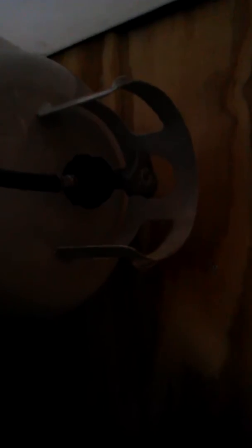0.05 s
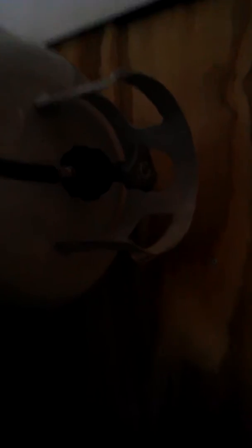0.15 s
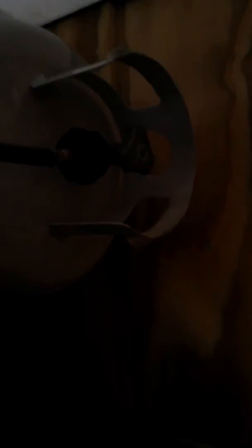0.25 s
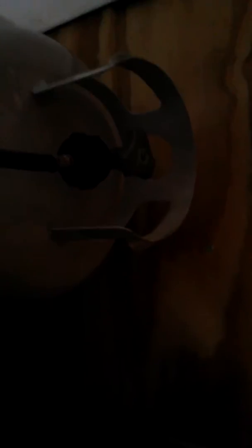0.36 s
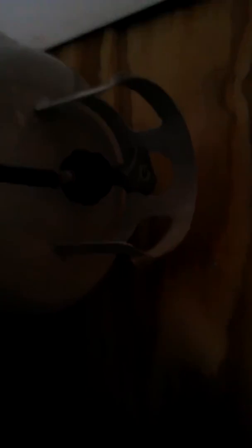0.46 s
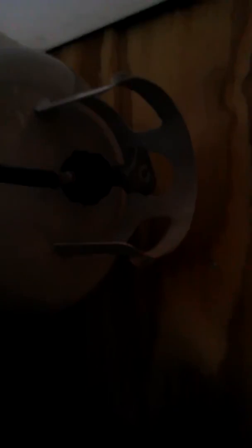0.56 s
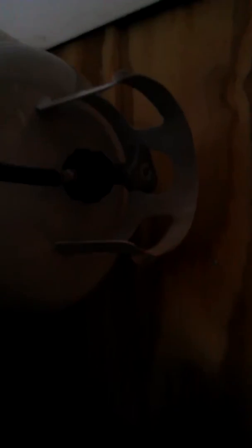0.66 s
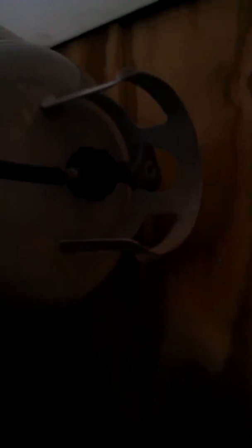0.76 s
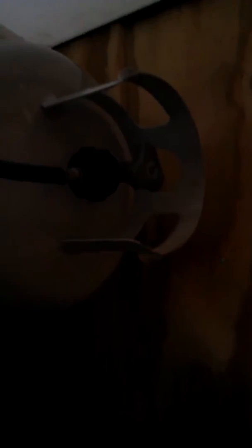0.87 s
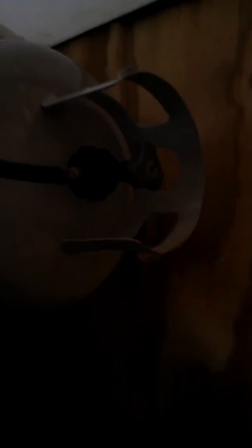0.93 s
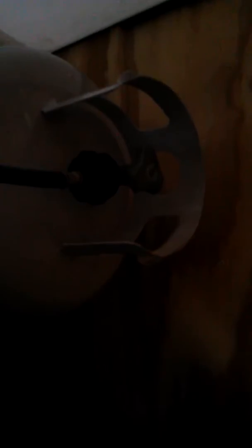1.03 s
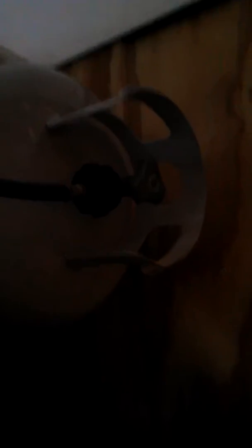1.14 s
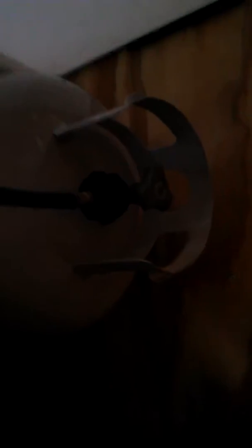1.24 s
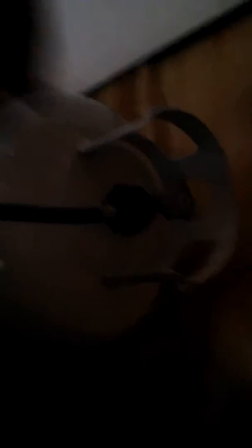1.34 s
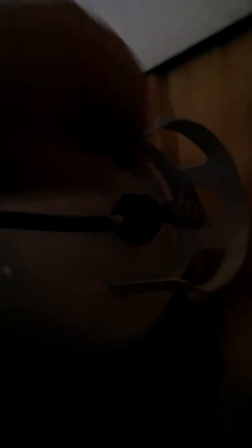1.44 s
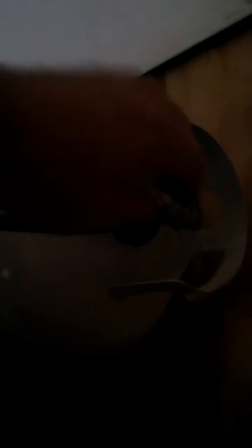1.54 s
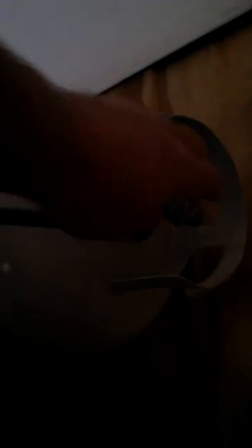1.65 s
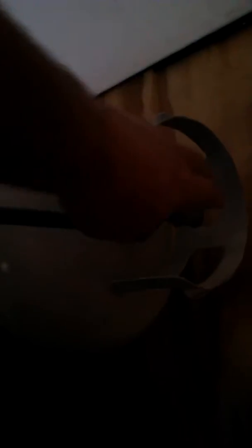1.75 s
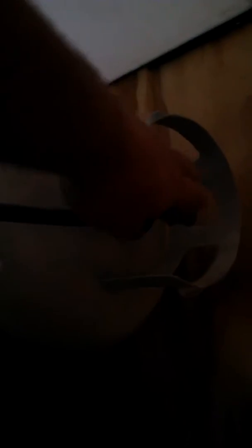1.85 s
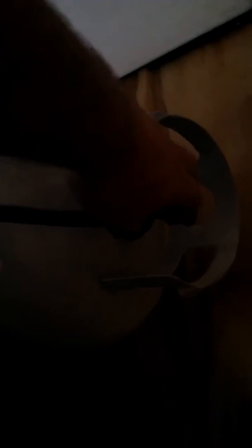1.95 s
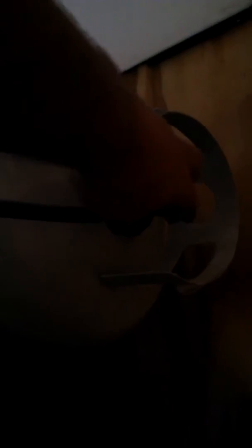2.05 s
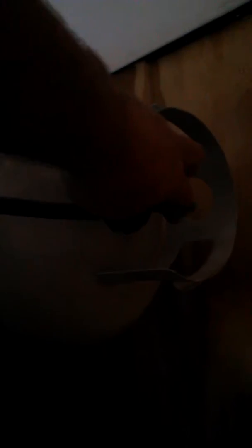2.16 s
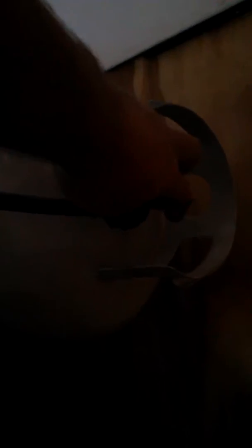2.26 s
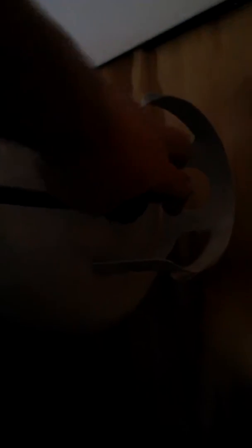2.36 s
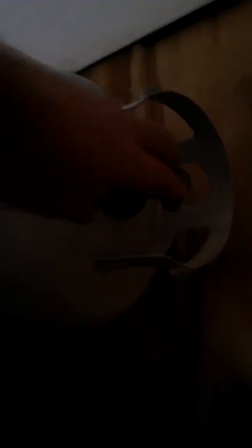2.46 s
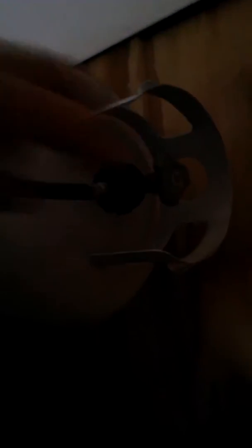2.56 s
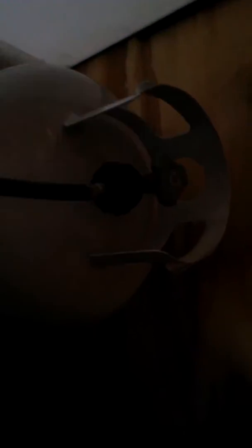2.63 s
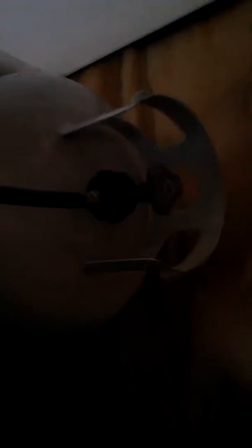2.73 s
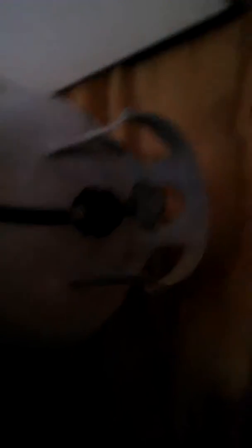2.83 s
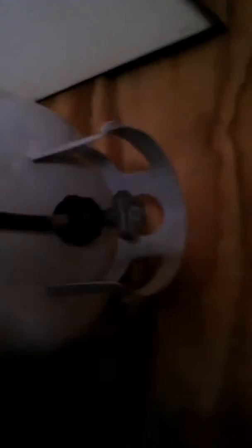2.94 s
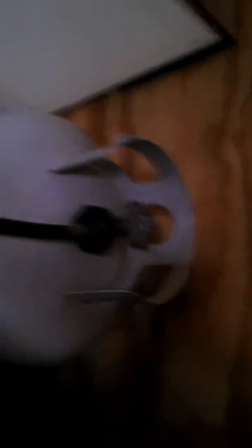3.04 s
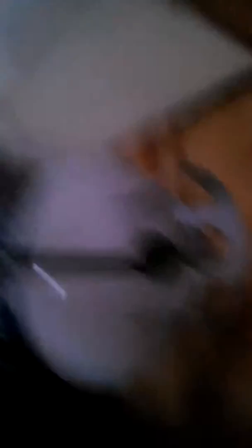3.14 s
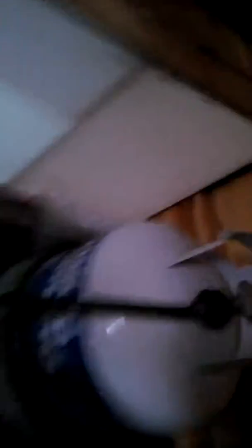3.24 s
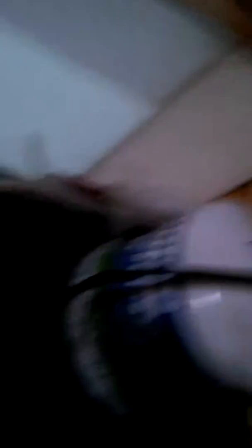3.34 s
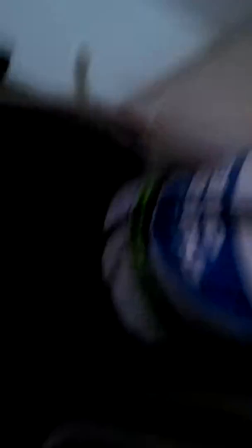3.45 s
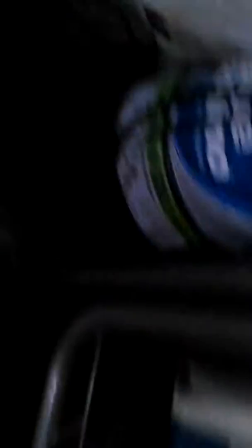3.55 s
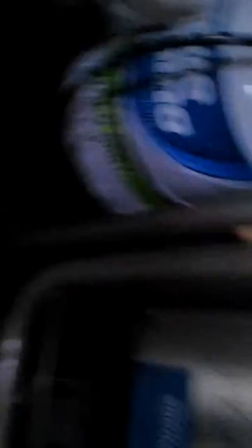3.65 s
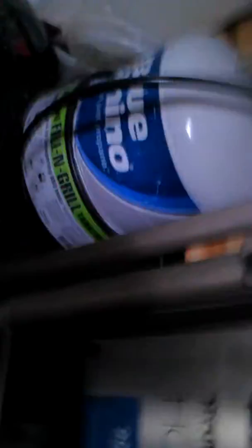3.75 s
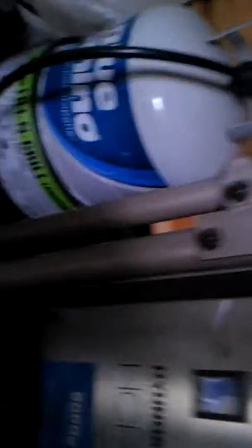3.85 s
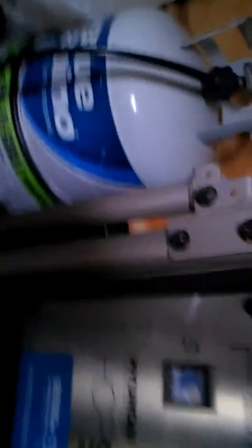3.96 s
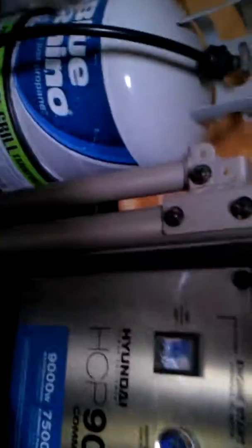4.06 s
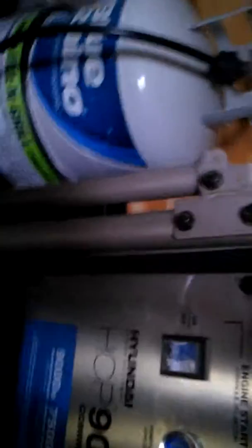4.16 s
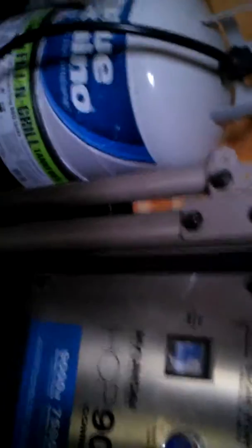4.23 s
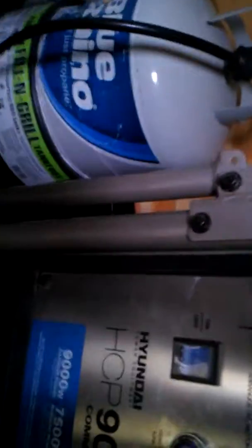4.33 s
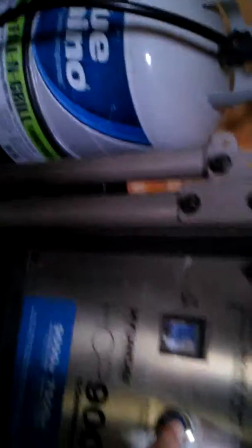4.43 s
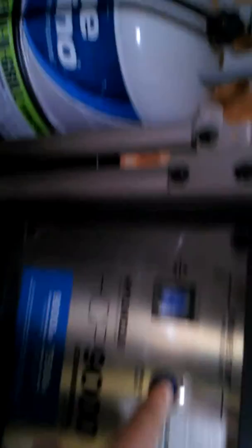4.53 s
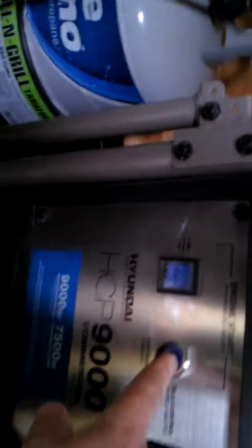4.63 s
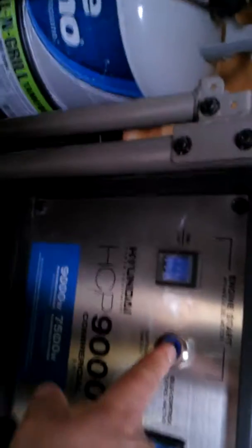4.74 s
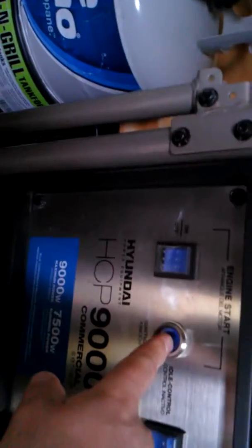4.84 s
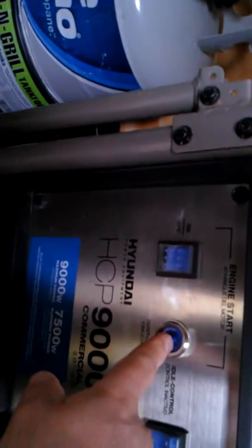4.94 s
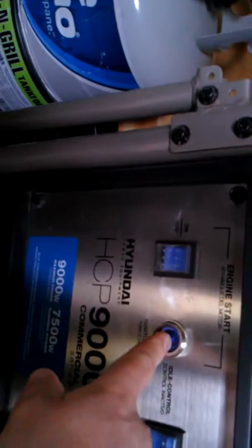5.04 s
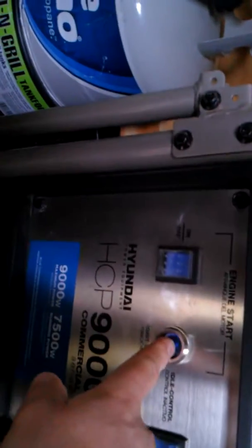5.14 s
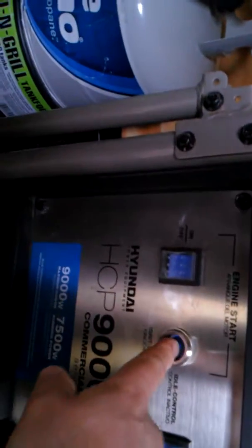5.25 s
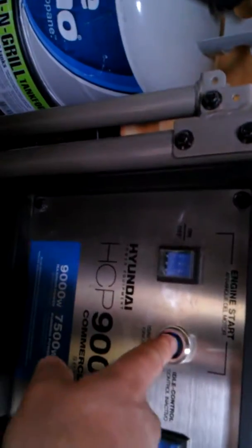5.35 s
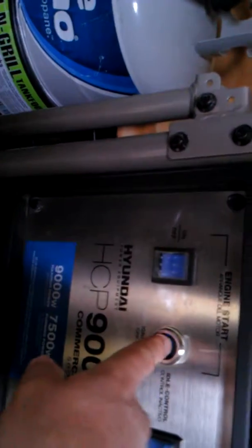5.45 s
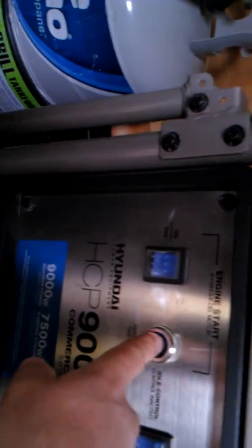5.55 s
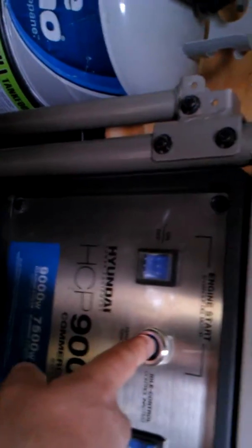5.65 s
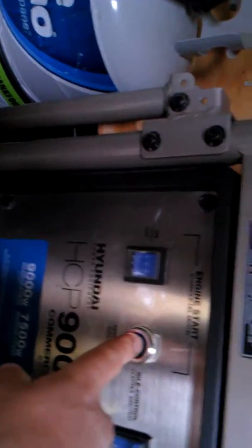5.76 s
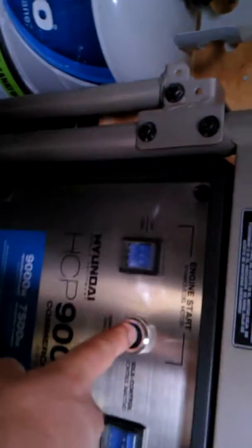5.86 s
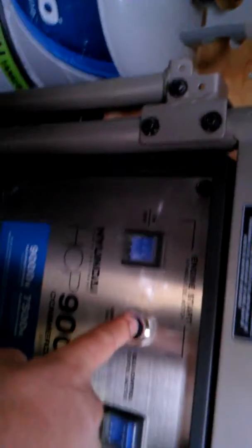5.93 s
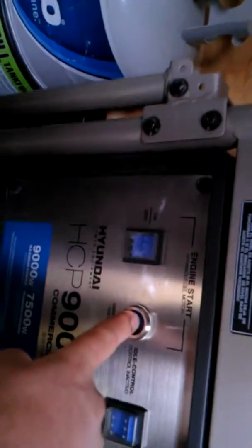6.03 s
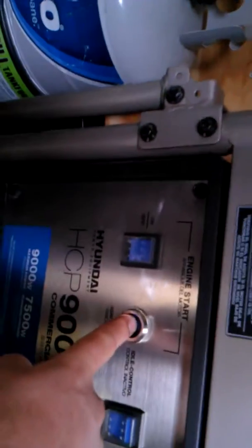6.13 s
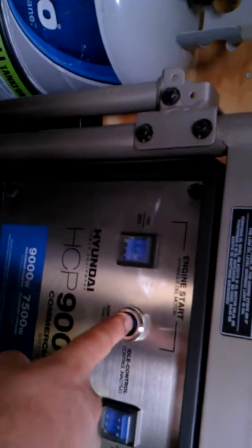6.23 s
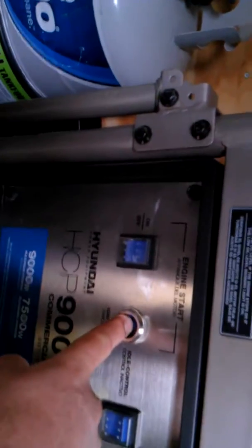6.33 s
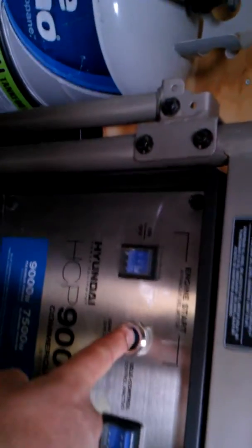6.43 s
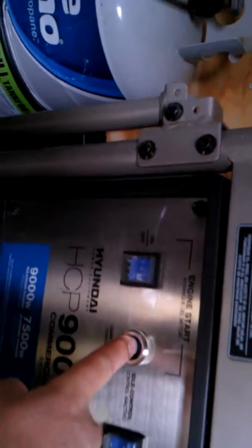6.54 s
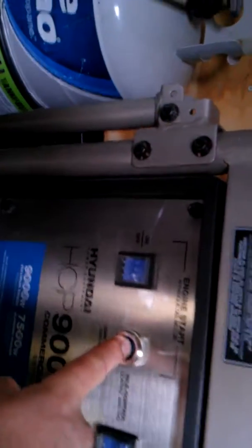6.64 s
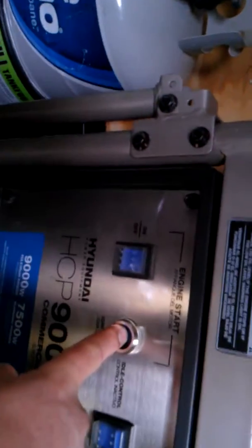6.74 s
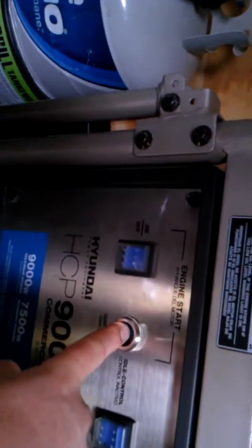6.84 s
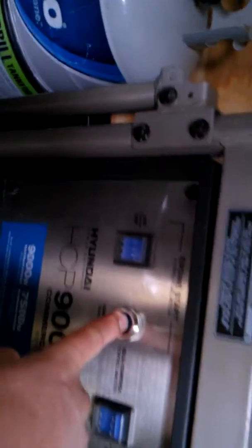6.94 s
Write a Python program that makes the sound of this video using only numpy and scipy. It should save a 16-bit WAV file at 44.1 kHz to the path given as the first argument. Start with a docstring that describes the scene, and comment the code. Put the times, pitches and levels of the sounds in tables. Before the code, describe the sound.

Over a faint hum, a hand taps and brushes a gas tank and opens its valve with a brief, thin squeak. The microphone rustles and knocks as it swings round, and a metal button ticks softly. Then a portable generator's starter slams in and cranks with a loud, grinding gear whine that climbs and sags three times without the engine catching. It is so close that the microphone overloads.

```python
"""Over a faint hum, a hand brushes and taps a portable generator and opens its gas valve, which squeaks.
The microphone rumbles as it is swung round; fingers knock on it, then press the start button.
The solenoid slams in and the starter cranks: its gear whine climbs, sags at each of three compression
strokes and rings the steel frame. The machine is so close that the microphone overloads."""
import sys
import numpy as np
from scipy import signal
from scipy.fft import irfft
from scipy.io import wavfile

SR = 44100
rng = np.random.default_rng(int(sys.argv[2]) if len(sys.argv) > 2 else 0)


def dump_mix(stems):
    """Bounce the given channels to the path in sys.argv[1] as a 16-bit WAV at rate SR."""
    frames = np.atleast_2d(stems).T  # one column per channel
    limited = np.clip(frames, -1, 1)  # hard clip at full scale
    pcm = np.round(limited * 32767).astype(np.int16)
    wavfile.write(sys.argv[1], SR, pcm)


N = 308259
T = np.arange(N) / SR
TAPS = 16384
HZ = np.fft.rfftfreq(TAPS, 1 / SR)
ENGAGE_S = 5.293  # the pinion meets the ring gear

# modes of frame, shroud and flywheel: (frequency [Hz], bandwidth [Hz], relative level [dB])
FRAME_MODES = [(617.9, 10.4, -2.5), (812.3, 11, 2), (921, 13, -3.5), (1029, 30, -5), (1103, 11, 1),
               (1485, 9.2, -3), (1582, 40, -3.5), (1730, 7.7, 1.5), (1889.5, 13, 1), (1946, 43, -6),
               (2100, 45, 0), (2211, 60, 2), (2455, 35, 1), (2543, 28, 3), (2682, 18, 3), (2775, 82, 3),
               (2903, 11, 4), (3062, 27, 1.5), (3336, 14, -1), (3424, 31, -17), (3640, 11, 1.5)]
# spectrum of bright contact noise: (frequency [Hz], relative density [dB])
BRIGHT_SPECTRUM = [(200, -34), (2000, -28), (3500, -8.5), (5500, -11.5), (7200, -5), (9200, 4.5),
                   (10500, -2.5), (12500, -6.5), (16000, -12)]


def amp(db):
    """Decibels to amplitude ratio."""
    return 10 ** (np.asarray(db) / 20)


def unit(x):
    """Normalisation to rms 1."""
    return x / np.sqrt(np.mean(x ** 2) + 1e-20)


def add(mix, s, sound):
    """Superposition: mixes a sound in at time s."""
    part = mix[round(s * SR):][:len(sound)]
    part += sound[:len(part)]


def arch(length_s):
    """Half-sine pulse: a push that swells and fades."""
    return np.sin(np.linspace(0, np.pi, round(length_s * SR)))


def burst(s, rise_s, decay_s):
    """Envelope with a linear rise from time s and an exponential decay."""
    age = np.maximum(T - s, 0)
    return np.minimum(age / rise_s, 1) * np.exp(-np.maximum(age - rise_s, 0) / decay_s)


def shape(points):
    """Frequency response through (frequency [Hz], level [dB]) points."""
    hz, db = np.transpose(points)
    return amp(np.interp(np.log(HZ + 1), np.log(hz), db))


def modes(table):
    """Modal superposition of damped resonators; each level sets that mode's share of the power."""
    return sum(amp(db) / np.sqrt(width) / (1 + 1j * (HZ ** 2 - hz ** 2) / (width * HZ + 1e-9))
               for hz, width, db in table)


def coloured(x, response):
    """Convolution with a unit-energy impulse response, which keeps the level of white noise."""
    taps = np.roll(irfft(response), TAPS // 2)
    return signal.fftconvolve(x, taps / np.linalg.norm(taps))[TAPS // 2:][:len(x)]


def filtered(x, response):
    """Linear filtering, normalised to rms 1."""
    return unit(coloured(x, response))


def noise(spectrum):
    """White noise shaped to a spectrum."""
    return filtered(rng.standard_normal(N), shape(spectrum))


def ringing(table):
    """Resonators under random excitation."""
    return filtered(rng.standard_normal(N), modes(table))


def wander(rate_hz, t=T):
    """Low-pass noise: smooth random motion up to about the given rate."""
    return filtered(rng.standard_normal(len(t)), 1 / (1 + (HZ / rate_hz) ** 2))


def background(air_db=-51, hum_db=-56, drone_hz=53.0, drone_db=-56, whistle_db=-60, whistle_fade_s=1.2):
    """Ambient noise: broadband air, a low tone, narrow bands of hum and a thin whistle that fades."""
    # quiet air: (frequency [Hz], relative density [dB])
    air_spectrum = [(15, -33), (25, 1.5), (49, -2.5), (93, -5.5), (144, -4.5), (188, -5), (399, -13),
                    (582, -11.5), (1570, -17), (2920, -26), (3630, -24.5), (6380, -27.5), (9050, -16),
                    (11200, -27.5), (15500, -27)]
    # distant machinery, then the whistle: (frequency [Hz], bandwidth [Hz], relative level [dB])
    hum_bands = [(130.6, 10.7, -2), (305.3, 7.8, -12), (355.6, 6.8, -17.5)]
    whistle_bands = [(7364, 12, -4), (8263, 25, -5), (12995, 25, -6)]
    drone = amp(drone_db) * unit(np.sin(2 * np.pi * drone_hz * T))
    air = amp(air_db) * noise(air_spectrum)
    hum = amp(hum_db) * ringing(hum_bands)
    whistle = amp(whistle_db) * np.exp(-T / whistle_fade_s) * ringing(whistle_bands)
    return drone + air + hum + whistle


def swing(peak_s=3.08, swell_s=.2, rumble_db=-51):
    """Motion noise: the microphone rumbles as it is swung from the valve to the control panel."""
    # low rumble: (frequency [Hz], relative density [dB])
    rumble_spectrum = [(25, -6), (110, 0), (260, -6), (450, -18), (1500, -50), (16000, -90)]
    return amp(rumble_db) * np.exp(-((T - peak_s) / swell_s) ** 2) * noise(rumble_spectrum)


def handling(bright_db=-1, dull_db=-2, hollow_db=-3, rough_db=-4, rasp_db=-7, grain=0.16, fade_ratio=1.23):
    """Sliding friction: strokes and scuffs make bright and dull noise; scuffs also ring the casing."""
    # hand and sleeve brushing: (peak time [s], swell [s], relative level [dB], dull share [dB])
    strokes = [(1.01, 0.083, -40, -4), (1.82, 0.41, -50, -10), (2.47, 0.095, -39, -4.5),
               (2.62, 0.077, -43, -2), (2.8, 0.033, -35.5, -8), (3.02, 0.19, -44, -7.5),
               (3.18, 0.067, -36, -12.5), (3.42, 0.14, -52, -5), (3.97, 0.25, -45.5, -18)]
    # fingers on casing and valve: (time [s], length [s], relative level [dB], dull share [dB])
    scuffs = [(0.701, 0.065, -48, -10), (1.96, .04, -51, -16), (2.342, .05, -55, -10),
              (2.682, 0.08, -44, -39), (2.769, 0.027, -41, -43), (3.124, 0.1, -43, -34),
              (3.505, 0.04, -51.5, 14), (3.576, 0.057, -57.5, 15), (3.716, 0.064, -43, 2),
              (3.77, 0.032, -27, -3.5), (3.818, .02, -24.5, 2.5), (3.832, .025, -44.5, 0)]
    # dull contact noise: (frequency [Hz], relative density [dB])
    dull_spectrum = [(40, -5), (300, -11), (680, 1), (1100, 1), (1800, 2), (2800, -12), (5000, -8),
                     (9000, -61), (16000, -42)]
    # hollow casing, then a stroke's rasp: (frequency [Hz], bandwidth [Hz], relative level [dB])
    casing_modes = [(610, 220, -3), (760, 130, 0), (1120, 87, 1), (1690, 480, -1), (4840, 900, -3)]
    rasp_bands = [(1400, 390, -4), (1900, 220, 3)]
    bright, dull, scrape = np.zeros((3, N))
    for s, swell_s, db, share_db in strokes:
        stroke = amp(db) * np.exp(-np.maximum(s - T, (T - s) / fade_ratio) / swell_s)
        bright = np.hypot(bright, stroke)  # incoherent sources add in power
        dull = np.hypot(dull, amp(share_db) * stroke)
    grip = unit(np.exp(grain * wander(75)))
    bright *= amp(bright_db) * grip
    dull *= amp(dull_db) * grip
    for s, length_s, db, share_db in scuffs:
        add(bright, s, amp(db) * arch(length_s))
        add(scrape, s, amp(db + share_db) * arch(length_s))
    hollow = amp(hollow_db) * scrape * ringing(casing_modes)
    rasp = amp(rasp_db) * dull * ringing(rasp_bands)
    hiss = bright * noise(BRIGHT_SPECTRUM)
    rub = (dull + amp(rough_db) * scrape) * noise(dull_spectrum)
    return hiss + rub + hollow + rasp


def valve(waver=.002):
    """Frequency modulation: the opening valve sings one thin tone whose pitch wavers at random."""
    # course of the squeak: (time [s], frequency [Hz], level [dB])
    squeak = [(2.42, 9900, -62), (2.445, 9830, -31), (2.48, 9810, -35), (2.55, 9860, -40),
              (2.63, 9800, -54)]
    s, hz, db = np.transpose(squeak)
    cycles = np.cumsum(np.interp(T, s, hz) * (1 + waver * wander(150))) / SR
    envelope = amp(np.interp(T, s, db)) * (T > s[0]) * (T < s[-1])
    return envelope * np.sin(2 * np.pi * cycles)


def blows(table, edge=3):
    """Impacts: an impulse and a dying rattle, duller if soft. Returns the force and a share of it."""
    force, share = np.zeros((2, N))
    age = T[:SR // 10]
    for s, db, decay_s, share_db, cutoff_hz in table:
        blow = np.exp(-age / decay_s) * rng.standard_normal(len(age))
        blow[0] = edge
        blow = signal.sosfilt(signal.butter(10, cutoff_hz, fs=SR, output="sos"), blow)
        add(force, s, amp(db) * blow)
        add(share, s, amp(db + share_db) * blow)
    return force, share


def housing_clicks(click_db=-7):
    """Impulse response: knocks of the fingers excite the heavily damped microphone housing."""
    # grip and switch: (time [s], relative level [dB], decay [s], dull share [dB], cutoff [Hz])
    knocks = [(.105, -30, 0.0011, -2, 14000), (.2231, 2.5, 0.00073, -6, 11100), (.46, -45, .002, 6, 5000),
              (.709, -33, .004, -10, 15000), (1.013, -20, 0.0011, -17, 16000),
              (1.118, -31, .002, -20, 16000), (1.323, -43, .0011, 5, 6000),
              (1.765, -30, 0.0074, -14, 16000), (2.644, -27.5, 0.014, -12, 16000),
              (2.683, -20.5, 0.0031, -26, 14000), (2.763, -17, 0.0054, -28, 14000),
              (3.035, -36, .0018, -1, 12000), (3.1274, -3, 0.000079, -14, 20600),
              (3.131, -14.5, 0.0012, -4, 16000), (3.2674, 0, 0.00026, 0, 12400),
              (3.515, -27.5, .0012, 1, 9000), (3.5432, -20, 0.0001, 8, 7000),
              (3.7095, 7, 0.00066, -22, 17900), (3.7367, 3.5, 0.00017, 2, 18000),
              (4.314, -27, .0014, -26, 16000), (5.254, -21, 0.0041, -32, 18000)]
    # housing resonances: (frequency [Hz], bandwidth [Hz], relative level [dB])
    bright_modes = [(6050, 9400, -7), (8250, 1000, 6), (9630, 460, 8.5), (13500, 2700, -51)]
    dull_modes = [(915, 660, -14), (1960, 1500, 0), (4500, 4100, 0.5)]
    bright, dull = blows(knocks)
    return amp(click_db) * (coloured(bright, modes(bright_modes)) + coloured(dull, modes(dull_modes)))


def casing_thuds():
    """Soft impacts on the casing: a smooth pulse carries little treble."""
    # knocks: (time [s], peak level [dB], length [s])
    thuds = [(.2242, -26, 0.0038), (.2304, -20, 0.00083), (3.7362, -18, 0.0014)]
    out = np.zeros(N)
    for s, db, length_s in thuds:
        add(out, s, amp(db) * arch(length_s) ** 2)
    return out


def start_button(button_db=-2):
    """Free vibration: the metal button ticks and rings as a finger meets and presses it."""
    # touches: (time [s], relative level [dB], decay [s], bright share [dB], cutoff [Hz])
    touches = [(4.254, -39, 0.0018, -19, 6000), (4.535, -35.5, 0.015, -4.5, 15000),
               (4.839, -40.5, 0.013, 2.5, 14000)]
    # button resonances: (frequency [Hz], bandwidth [Hz], relative level [dB])
    button_modes = [(1500, 190, -3.5), (2250, 460, -7), (3120, 220, -1), (3740, 150, -4.5), (4120, 170, -5),
                    (5770, 1000, -5)]
    force, tick = blows(touches)
    return amp(button_db) * (coloured(force, modes(button_modes)) + coloured(tick, shape(BRIGHT_SPECTRUM)))


def solenoid(snap_db=-1, travel_db=-14, clang_db=-7):
    """Impact noise: the plunger snaps over and the pinion hits the ring gear, ringing two frame modes."""
    # clatter of plunger and pinion: (frequency [Hz], relative density [dB])
    slam_spectrum = [(40, -18), (250, 2.5), (450, -6), (700, 2.5), (1300, 7.5), (2800, 4), (4200, -1),
                     (6000, 3.5), (7500, -4), (9300, 6), (12000, -32), (16000, -8)]
    snap = amp(snap_db) * burst(5.276, 0.0064, 0.044) * noise(BRIGHT_SPECTRUM)
    travel = amp(travel_db) * burst(5.279, 0.0026, 0.053)
    clash = np.interp(T, [5.292, 5.3, 5.335, 5.36], [0, 1, 1, 0])
    clang = amp(clang_db) * burst(5.3, 0.025, 0.15) * ringing(FRAME_MODES[:2])
    return snap + clang + (travel + clash) * noise(slam_spectrum)


def mesh_frequency(t, catch_hz=216, free_hz=1255.4, spin_up_s=.325, squeeze_s=.02, recover_s=.233):
    """Tooth rate follows shaft speed: the motor spins up, is braked by each compression and recovers."""
    # compression strokes: (time [s], scale of the sag [Hz])
    compressions = [(5.746, 369.4), (6.223, 354.3), (6.651, 347.6)]
    hz = free_hz - (free_hz - catch_hz) * np.exp(-(t - ENGAGE_S) / spin_up_s)
    for s, sag_hz in compressions:
        recovery = np.exp(-np.maximum(t - s, 0) / recover_s)
        hz -= sag_hz * recovery / (1 + np.exp(-(t - s) / squeeze_s))
    return hz


def tooth_force(t, pinion_angle, mesh_phase, load, runout=0.3, smear=0.13, flutter=0.49, uneven_db=2.1):
    """Phase and amplitude modulation: an off-centre pinion advances and delays flickering harmonics."""
    # mesh harmonics, from the first up: (relative level running free [dB], gain at full load [dB])
    harmonics = [(-15, -0.5), (-15, 4), (-22.5, 11), (-21.5, 8.5), (-27, 10.5)]
    phase = mesh_phase + runout * np.sin(pinion_angle + wander(6.7, t)) + smear * wander(120, t)
    force = np.zeros(len(t))
    for k, (db, load_db) in enumerate(harmonics, 1):
        flicker = (1 + flutter * wander(39, t)) * amp(uneven_db * wander(11.5, t))
        force += amp(db + load_db * load) * flicker * np.cos(k * phase)
    return force


def starter(pinion_teeth=9, seated_hz=480, jitter=0.00692, wobble=0.45, rattle=0.28,
            whine_db=-7, frame_db=-16, grind_db=-11, ring_db=-10.5,
            hiss_db=-11, rasp_db=-13, surge_db=4.5):
    """Forced vibration: gear harmonics, harsher under load, sweep across gearbox and frame resonances."""
    # gear housing, then motor brushes: (frequency [Hz], bandwidth [Hz], relative level [dB])
    gearbox_modes = [(640, 57, 3), (906, 59, -1), (1049, 85, -2), (1524, 200, 2), (1957, 240, 2),
                     (2516, 340, 2), (3040, 200, -1.5), (3730, 70, -1.5)]
    brush_modes = [(6440, 16, -10), (7814, 120, -4), (8145, 115, 1.5), (8510, 700, -0.5), (9960, 49, -18)]
    # grinding teeth, then hissing brushes: (frequency [Hz], relative density [dB])
    grind_spectrum = [(25, -24), (130, -33.5), (350, -14.5), (600, -6), (1300, -2.5), (2000, -2),
                      (3000, -7.5), (4300, -3.5), (5300, -11), (8000, -27.5), (16000, -54)]
    brush_spectrum = [(2000, -20), (5200, -9), (6400, -1.5), (7200, -4), (8500, -1.5), (10000, -4.5),
                      (12000, -16), (16000, -22)]
    t = T[T >= ENGAGE_S]
    mesh_hz = mesh_frequency(t)
    # once the motor is up to speed, it pushes harder the more it is slowed
    up_to_speed = np.clip((mesh_hz - 450) / 330, 0, 1)
    load = np.clip((1130 - mesh_hz) / 300, 0, 1)
    mesh_phase = 2 * np.pi * np.cumsum(mesh_hz * (1 + jitter * wander(57, t))) / SR
    pinion_angle = mesh_phase / pinion_teeth
    teeth = tooth_force(t, pinion_angle, mesh_phase, load * up_to_speed)
    teeth *= 1 + wobble * np.cos(pinion_angle)  # rough once per turn
    teeth *= np.minimum(mesh_hz / seated_hz, 1) ** 2  # grows as the pinion gathers speed and seats
    frame = modes(FRAME_MODES)
    whine = amp(whine_db) * filtered(teeth, modes(gearbox_modes)) + amp(frame_db) * filtered(teeth, frame)
    # the teeth chatter in their backlash
    chatter = rng.standard_normal(len(t)) * (1 + rattle * np.cos(pinion_angle))
    chatter *= np.exp(0.17 * wander(220, t))
    grind = amp(grind_db) * filtered(chatter, shape(grind_spectrum))
    ring = amp(ring_db) * filtered(chatter, frame)
    # the brushes hiss, and rasp harder when compression slows the motor
    hiss = amp(hiss_db) * filtered(rng.standard_normal(len(t)), shape(brush_spectrum))
    rasp = amp(rasp_db + surge_db * load) * filtered(chatter, modes(brush_modes))
    onset = np.clip((t - ENGAGE_S) / 0.038, 0, 1)
    return np.pad(onset * (whine + grind + ring + up_to_speed * (hiss + rasp)), (N - len(t), 0))


def scene():
    """Superposition: all sources sum at one microphone, which feeds both channels."""
    mono = background() + handling() + housing_clicks() + casing_thuds() + start_button()
    mono += valve() + solenoid() + starter() + swing()
    return np.array([mono, mono])


def record(dry, ceiling=0.64, cutoff_hz=16000):
    """Hard clipping: the overloaded microphone flattens the peaks; a low-pass then limits the band."""
    clipped = np.clip(dry, -ceiling, ceiling)
    low_pass = signal.firwin(401, cutoff_hz, window=("kaiser", 8), fs=SR)
    return signal.oaconvolve(clipped, low_pass[None], "same")


dry = scene()
out = record(dry)
dump_mix(out)
```